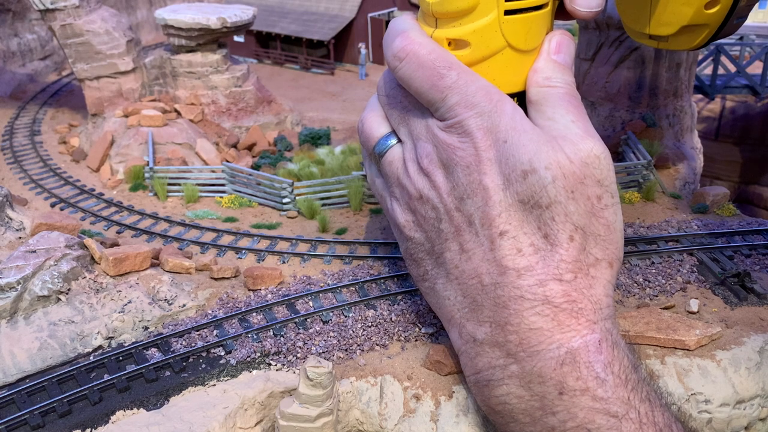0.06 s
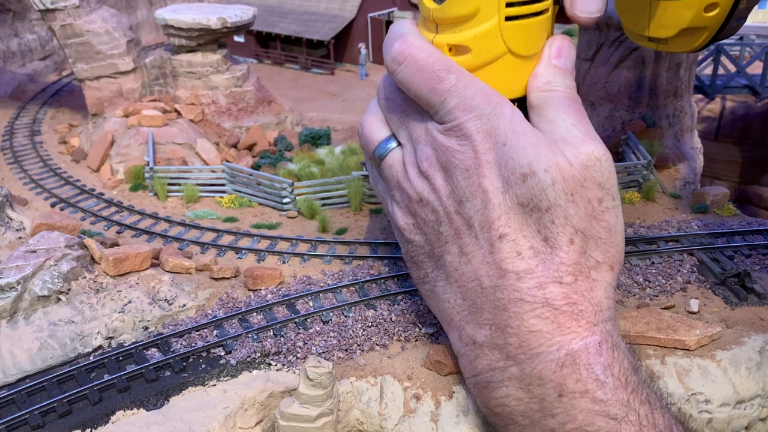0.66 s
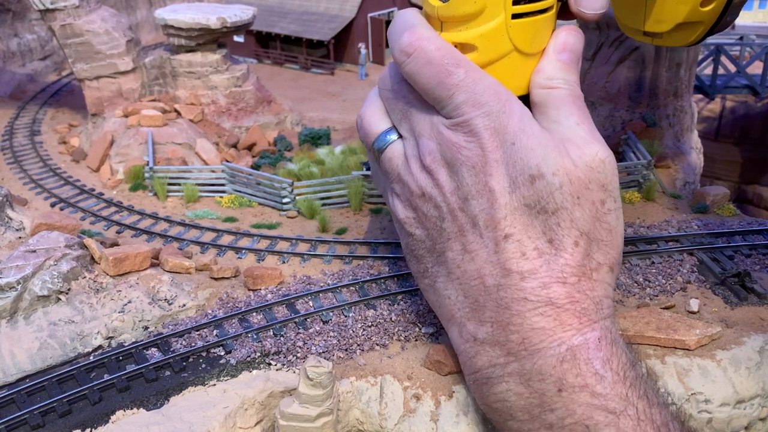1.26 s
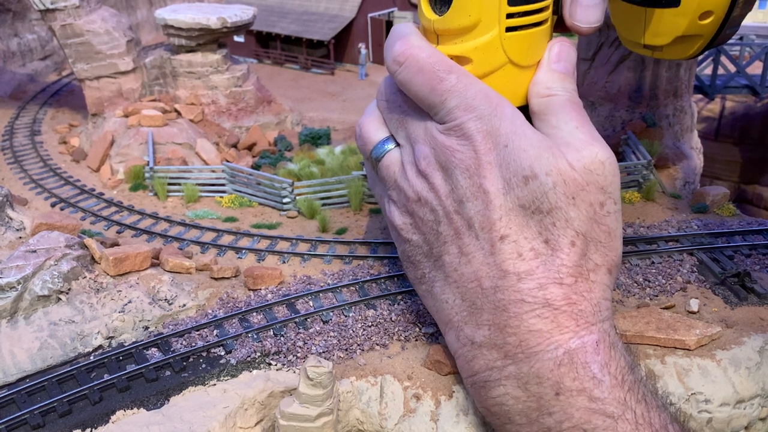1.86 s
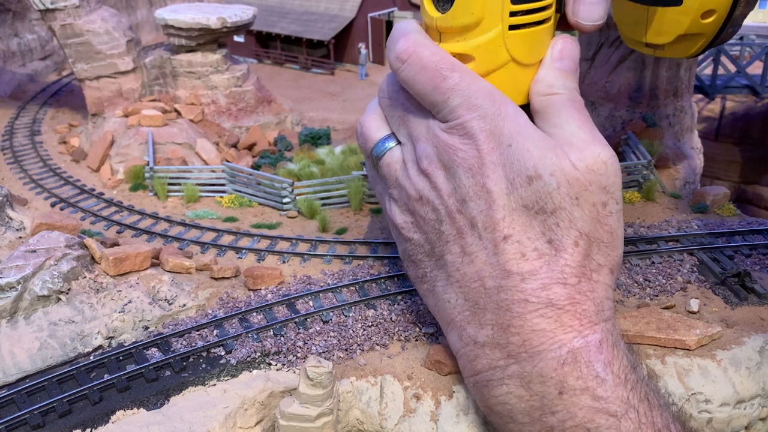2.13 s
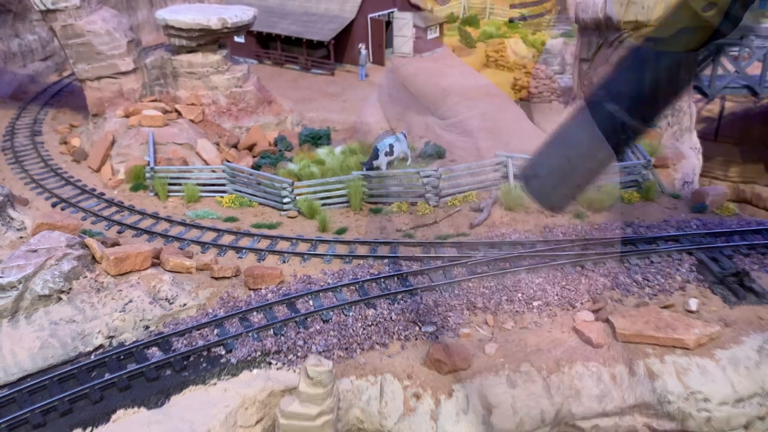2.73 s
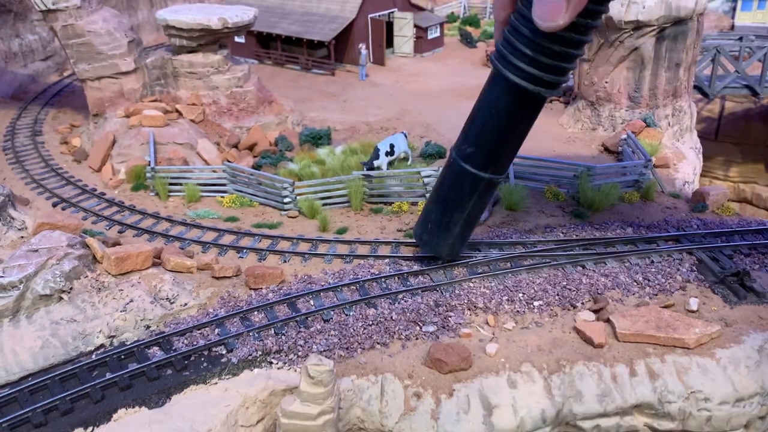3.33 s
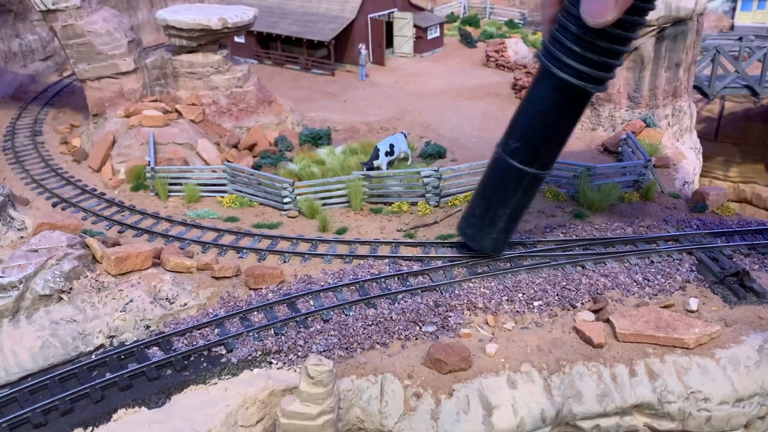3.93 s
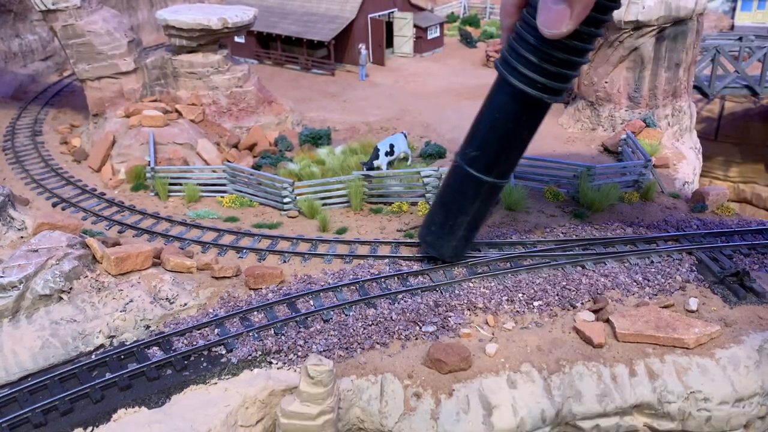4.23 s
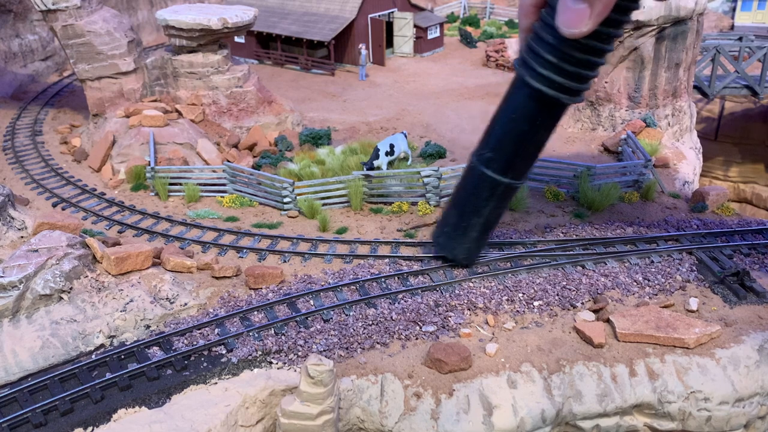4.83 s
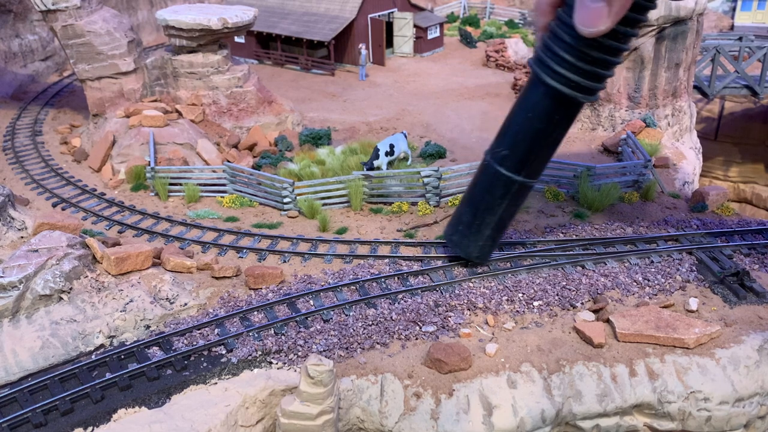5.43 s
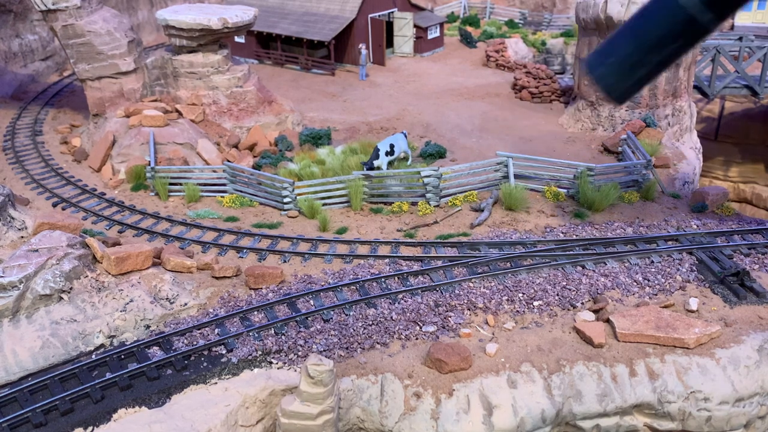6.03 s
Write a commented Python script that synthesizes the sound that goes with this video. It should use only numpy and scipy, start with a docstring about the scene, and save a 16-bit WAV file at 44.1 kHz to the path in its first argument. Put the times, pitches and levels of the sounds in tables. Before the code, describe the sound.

A small electric drill whirs steadily and fades, then a switch clicks and a vacuum cleaner spins up, hisses and starts winding down.

```python
"""A small electric drill whirs through a model railway board, close to the microphone, and fades out. A switch
clicks; a vacuum cleaner spins up, its nozzle hisses over the track, and it winds down. The drill is rotor and
gear lines over a rasp, with the board droning under the bit; the vacuum is fan tones in a roar of air. The
place is a quiet room, heard through a two-port stereo microphone."""
import sys
import numpy as np
from scipy import signal
from scipy.fft import rfft, irfft, next_fast_len
from scipy.io import wavfile
from scipy.ndimage import uniform_filter1d

SR = 44100
rng = np.random.default_rng(int(sys.argv[2]) if len(sys.argv) > 2 else 0)


def wav_out(sig):
    """Save sig, one row per channel (or a flat mono array), as 16-bit PCM at SR to the path in sys.argv[1]."""
    wavfile.write(sys.argv[1], SR, np.round(np.clip(np.atleast_2d(sig).T, -1, 1) * 32767).astype(np.int16))


N = 268083
TIME, BINS = np.arange(N) / SR, np.fft.rfftfreq(N, 1 / SR)
SWITCH_S, OFF_S = 3.312, 5.52  # the vacuum's power comes on, goes off
FAN_HZ = 328.9  # turns a second at top speed
SPIN_UP_S, FLOW_UP_S = 0.3, 0.45  # time constants: the air flow builds more slowly than the fan


def amp(db):
    """Decibels to gain."""
    return 10 ** (np.asarray(db) / 20)


def unit(x):
    """Scales to rms 1."""
    return x / np.sqrt(np.mean(x ** 2) + 1e-20)


def tone(turns):
    """A sine of rms 1."""
    return np.sqrt(2) * np.sin(2 * np.pi * turns)


def follow(rows):
    """Each column of a curve table at every sample."""
    times, *columns = np.transpose(rows)
    return [np.interp(TIME, times, column) for column in columns]


def held(start, end, edge):
    """Rises from 0 to 1 around start, holds, and falls back around end."""
    return np.clip(np.minimum(TIME - start, end - TIME) / edge + .5, 0, 1)


def spectrum(points):
    """A spectrum table at every frequency bin."""
    hz, value = np.transpose(points)
    return np.interp(np.log(BINS + 1), np.log(hz + 1), value)


def resonances(peaks, at=BINS):
    """Peaks and dips as a dB curve over frequency."""
    return sum(db / (1 + (2 * (at - hz) / width) ** 2) for hz, width, db in peaks)


def pan(side_db):
    """Left and right gains of constant total power; positive is left."""
    gains = amp(np.array([side_db, -side_db]) / 2).reshape(2, -1)
    return gains / np.sqrt(np.mean(gains ** 2, 0))


def drift(hz):
    """Random wander of rms 1, up to about the given rate."""
    size = next_fast_len(N, True)
    rolloff = 1 + (np.fft.rfftfreq(size, 1 / SR) / hz) ** 4
    return unit(irfft(rfft(rng.standard_normal(size)) / rolloff, size)[:N])


def breathy(hz, width_hz):
    """A narrow band of turbulence of rms 1 around a steady or gliding pitch."""
    turns = np.cumsum(hz * np.ones(N)) / SR
    return (np.exp(2j * np.pi * turns) * (drift(width_hz) + 1j * drift(width_hz))).real


def puff(peak_s, length_s, hz, width_hz, db):
    """A band of noise that swells and vanishes."""
    return amp(db) * np.exp(-(2 * (TIME - peak_s) / length_s) ** 2) * breathy(hz, width_hz)


def at_ports(pair):
    """Spectra of two unrelated signals, mixed as the microphone's two ports share them."""
    # how alike the ports sound: (frequency [Hz], likeness [0-1])
    likeness = [(60, 1), (300, 0.64), (800, 0.32), (1700, 0.84), (3000, 0.33), (4100, 0.22), (5800, 0.083),
                (7300, 0.64), (8600, 1), (9600, 0.97), (11000, 1), (15500, 0.97)]
    a, b = rfft(pair)
    same = np.clip(spectrum(likeness), 0, 1)
    return np.array([a, same * a + np.sqrt(1 - same ** 2) * b])


def noise():
    """Spectra of white noise at the two ports."""
    return at_ports(rng.standard_normal((2, N)))


def colour(spectra, shape_db, side_db=0.):
    """Shapes two spectra, places them, and returns sound of rms 1."""
    return unit(irfft(spectra * amp(shape_db) * pan(side_db), N))


def walls(x, count=500, t60=.35):
    """The room's sparse reflections, of random sign, dying away."""
    taps = np.zeros((2, SR // 3))
    delays = rng.integers(200, SR // 3, (2, count))
    np.put_along_axis(taps, delays, rng.choice([-1, 1], delays.shape) * amp(-60 * delays / SR / t60), 1)
    return signal.fftconvolve(x, taps / np.linalg.norm(taps[0]), axes=1)[:, :N]


def room_tone(level_db=-60.5):
    """The faint, low background of the room."""
    # background spectrum: (frequency [Hz], relative density [dB])
    floor = [(20, -44), (45, -6.5), (60, 6.5), (90, -1.5), (160, -6), (300, -17), (800, -21), (2000, -46.5),
             (15000, -47.5)]
    return amp(level_db) * colour(noise(), spectrum(floor), side_db=-1.)


def hose_thuds(rise_s=0.049):
    """The hose is shifted and thuds softly."""
    # bumps of the hose: (time [s], level [dB])
    thuds = [(5.63, -46.5), (5.76, -53.5)]
    level = 0
    for peak_s, db in thuds:
        age = np.maximum((TIME - peak_s) / rise_s + 1, 0)
        level = level + amp(db) * age * np.exp(1 - age)
    shape_db = spectrum([(15, -52), (30, -20), (50, 6), (75, -6.0), (130, 0), (400, -43), (2000, -80)])
    return level * colour(noise(), shape_db, side_db=-1.)


def switch(ring_db=-34.5, snap_db=-32.0, room_db=-6.0, rattle_db=-52, rattle_s=3.334):
    """A dry snap that knocks the plastic body, rattles briefly and scatters round the room."""
    # modes of the body: (frequency [Hz], relative level [dB], time to fall 60 dB [s])
    modes = [(1375, 0, 0.05), (2280, -8, 0.025), (2850, -6, 0.025), (3560, -7, 0.02), (4300, -6, 0.014),
             (5200, -9, 0.018), (7900, -5, 0.012)]
    # spectrum of the snap: (frequency [Hz], relative density [dB])
    snap_shape = [(300, 1), (1000, -12), (1400, 4), (2000, -4), (4000, 7.5), (6000, 0), (8200, 0),
                  (10000, -4), (15000, -13)]
    age = np.maximum(TIME - SWITCH_S, 0)
    ring = sum(amp(db - 60 * age / t60) * tone(hz * age) for hz, db, t60 in modes)
    snap = colour(noise(), spectrum(snap_shape)) * np.exp(-age / 0.0031) * np.clip(age / 0.0014, 0, 1)
    clack = amp(ring_db) * ring / abs(ring).max() + amp(snap_db) * snap
    rattle_age = TIME - rattle_s
    rattle = np.exp(-np.maximum(rattle_age, 0) / .014) * np.clip(rattle_age / .012 + 1, 0, 1)
    return clack + amp(room_db) * walls(clack) + amp(rattle_db) * rattle * breathy(3500, 550)


def inrush(hum_hz=120.2, hum_db=-54.5, overtone_db=1.5, rumble_db=-45.5, decay_s=0.84):
    """The starting current makes the vacuum's motor hum at twice the mains rate and jolts its housing."""
    age = np.maximum(TIME - SWITCH_S, 0)
    turns = np.cumsum(hum_hz * (1 + 0.037 * drift(26.0))) / SR
    hum = tone(turns) + amp(overtone_db) * tone(2 * turns) * (1 + .5 * drift(25))
    rumble = colour(noise(), spectrum([(40, -16), (130, 1), (270, 8), (500, 6), (900, 6.5), (2500, -43)]))
    jolt = puff(peak_s=3.521, length_s=.04, hz=290, width_hz=170, db=-46)
    return (amp(hum_db) * hum + amp(rumble_db) * rumble) * np.exp(-age / decay_s) + jolt


def squeak(peak_s=3.406, peak_hz=1070, peak_db=-39.5, glide_hz_per_s=7000):
    """A short rising squeak as the fan gathers speed; it swells and breaks off."""
    rise_db_per_s, fall_db_per_s = 380, 1400
    age = np.clip(TIME - peak_s, -.1, .1)
    hz = (peak_hz + glide_hz_per_s * age) * (1 + .04 * drift(150))
    db = peak_db + np.minimum(rise_db_per_s * age, -fall_db_per_s * age)
    return amp(db) * tone(np.cumsum(hz) / SR)


def rim_whistles():
    """Air whistles breathily over the nozzle's rim where the gap is narrowest."""
    # edge tones: (time [s], length [s], pitch [Hz], width [Hz], level [dB])
    whistles = [(4.693, 0.056, 9100, 900, -33), (4.762, 0.039, 12000, 2000, -24),
                (4.93, 0.044, 10040, 350, -33), (5.12, 0.046, 4700, 70, -35), (5.294, 0.052, 4300, 90, -36),
                (5.618, 0.074, 4520, 50, -34), (5.99, 0.08, 3390, 70, -46)]
    return sum(puff(*whistle) for whistle in whistles)


def hose_note(hz=843.0, width_hz=19.5):
    """The flow blows the hose's main standing wave into a hollow, fluttering note, left of centre."""
    # swell of the note: (time [s], level [dB])
    swell = [(3.35, -70), (3.45, -56), (3.475, -49), (3.51, -54), (3.7, -46), (4.1, -39), (4.9, -36),
             (5.22, -30.5), (5.45, -34.5), (6.08, -43)]
    level = amp(follow(swell)[0]) * (1 + 0.18 * drift(22.0))
    return level * pan(4.5) * breathy(hz, width_hz)


def spin(rise_s, half_speed_s=1.15):
    """Share of full speed: an exponential approach under power, then coasting against air drag."""
    driven = 1 - np.exp(-np.clip(TIME - SWITCH_S, 0, OFF_S - SWITCH_S) / rise_s)
    return driven / (1 + np.maximum(TIME - OFF_S, 0) / half_speed_s)


def power_law(share, full_db, db_per_decade):
    """Level in dB of a sound that grows as a power of speed or flow."""
    return full_db + db_per_decade * np.log10(share + 1e-4)


def blade_wakes():
    """Eddies behind the blades sing breathily, gliding with the fan and fading fast as it slows."""
    # eddy bands: (multiple of fan speed, width [Hz], level at top speed [dB])
    bands = [(12.25, 48, -47.5), (14.4, 114, -43.5)]
    speed = spin(SPIN_UP_S)
    eddies = sum(amp(db) * breathy(order * FAN_HZ * speed, width) for order, width, db in bands)
    return speed ** 3 * spin(FLOW_UP_S) ** 2 * eddies


def fan(blades=6, hum_law=(-34, 11), blade_law=(-39, 38), octave_law=(-50, 42), others_db=-44.5):
    """Unbalance hums once a turn; the blades whistle, and the room smears their glides."""
    # canister response that the tones glide through: (frequency [Hz], width [Hz], gain [dB])
    canister = [(262, 26, 4), (298, 22, 7), (900, 600, -12), (1370, 90, 5), (1570, 130, 5), (1770, 80, 3)]
    # the whistle and its octave swell and sink: (time [s], whistle gain [dB], octave gain [dB])
    swell = [(3.6, -8, 0), (3.78, 1, 0), (4.15, -2, 0), (4.28, 2, 10), (4.52, -4, 10.5), (4.7, 7.5, 3),
             (4.78, 6.5, 1), (4.84, 0, 4), (4.92, 0, 6), (4.97, 6.5, 10), (5.15, 10, 8), (5.38, 6.5, 7.5),
             (5.52, 9.5, 8), (5.6, 2, 3), (5.72, -1, 0)]
    radiates_hz, coast_db, coast_build_s = 198, 3.5, 0.13
    speed = spin(SPIN_UP_S)
    hz = FAN_HZ * speed
    turns = np.cumsum(hz * (1 + 0.00067 * drift(27))) / SR

    def partial(law, order, flutter=0.064):
        """One multiple of the turn, lifted or held back by the canister."""
        db = power_law(speed, *law) + resonances(canister, order * hz)
        return amp(db) * tone(order * turns) * (1 + flutter * drift(39))

    whistle_db, octave_db = follow(swell)
    whistle = partial(blade_law, blades) * amp(whistle_db) * pan(-3.6)
    whistle += partial(octave_law, 2 * blades) * amp(octave_db + 3.5 * drift(7))
    hum = partial(hum_law, 1, flutter=0.072) * pan(-2.3)
    hum *= hz ** 8 / (hz ** 8 + radiates_hz ** 8)  # the canister is too small to radiate a lower hum
    hum *= amp(coast_db * np.clip((TIME - OFF_S) / coast_build_s, 0, 1))  # rings out more while coasting
    # unequal blades leave faint lines on other multiples of the turn
    others = sum(tone(order * turns + rng.random()) * (1 + .5 * drift(15)) for order in (2, 3, 8))
    # while the speed changes, reflections lag in pitch and blur the whistle
    glide_hz_per_s = abs(uniform_filter1d(np.gradient(hz), size=2500)) * SR
    blurred = np.clip(glide_hz_per_s / 300, 0, .55)
    whistle = whistle * np.sqrt(1 - blurred) + walls(whistle * np.sqrt(blurred))
    return hum + whistle + amp(others_db) * speed ** 6 * others


def air(roar_law=(-26, 47.4), rush_law=(-27.5, 49.3), hiss_law=(-35.5, 70), turbulent_flow=0.24):
    """Turbulence grows with the flow and rings canister and hose; the nozzle hisses more near the track."""
    # low roar, mid rush, nozzle hiss and hiss of the gap at the track, each:
    # (frequency [Hz], relative density [dB])
    roar_shape = [(20, -47), (55, -17.5), (85, -15.5), (140, -18), (250, -1.5), (480, -8.5), (800, 0),
                  (1100, -5.5), (1600, -8.5), (3000, -46.5)]
    rush_shape = [(700, -29), (1400, -3), (2000, 3), (2700, -0.5), (3400, -1), (4100, -3), (5300, -5),
                  (7500, -11), (15000, -21)]
    hiss_shape = [(2000, -18), (5000, 1.5), (8000, 9.5), (10000, 7.5), (11800, 2), (13200, 2.5), (15700, 0)]
    gap_shape = [(3000, -9), (6000, 1.5), (8000, 1.5), (9500, 6), (11500, 2.5), (13200, 3), (15700, 1.5)]
    # standing waves of canister and hose: (frequency [Hz], width [Hz], gain [dB])
    standing_waves = [(660, 80, 2), (850, 50, 3), (1000, 70, 3), (1480, 120, 3), (1764, 25, 5),
                      (2220, 130, -3), (2400, 110, 5), (2590, 130, 6.5), (2930, 90, -3), (3060, 60, 4.5),
                      (3380, 60, 4), (3490, 70, -4), (4100, 220, 3)]
    # the vacuum's place at the microphone: (frequency [Hz], left minus right [dB])
    balance = [(100, 2), (350, -9.5), (620, 5.5), (900, 2.5), (1400, 0.5), (3800, -1), (5300, -2),
               (7000, -0.5)]
    # nozzle close to the track: (start [s], end [s], extra hiss at start [dB], at end [dB])
    passes = [(3.542, 3.858, 15.5, 8.5), (4.183, 4.362, 10.5, 9.5), (4.365, 4.558, 8, 7),
              (4.56, 4.67, 8.5, 3), (4.668, 4.785, 10, 7.5), (4.789, 5.013, 9.5, 4), (5.34, 5.567, 9.5, 8)]
    flow = spin(FLOW_UP_S)
    pipe_db, side_db = resonances(standing_waves), spectrum(balance)
    gust_db = drift(19)
    roar = colour(noise(), spectrum(roar_shape) + pipe_db, side_db)
    roar *= amp(power_law(flow, *roar_law) + gust_db)
    rush = colour(noise(), spectrum(rush_shape) + pipe_db, side_db)
    rush *= amp(power_law(flow, *rush_law) + gust_db / 2)
    hiss_db = power_law(flow, *hiss_law) + drift(56) + 1.5 * drift(7.4)
    near_db = sum(np.interp(TIME, [start, end], [first_db, last_db]) * held(start, end, edge=0.04)
                  for start, end, first_db, last_db in passes)
    gap = np.sqrt(np.maximum(amp(2 * near_db) - 1, 0)) * colour(noise(), spectrum(gap_shape), side_db)
    hiss = colour(noise(), spectrum(hiss_shape), side_db)
    turbulent = flow ** 8 / (flow ** 8 + turbulent_flow ** 8)  # no hiss until the flow turns turbulent
    return roar + rush + turbulent * amp(hiss_db) * (hiss + gap)


def drill_fade(start_s=2.145, end_s=3.125):
    """The drill's sound fades out along half a cosine."""
    return .5 + .5 * np.cos(np.pi * np.clip((TIME - start_s) / (end_s - start_s), 0, 1))


def board(hum_hz=96.7, idle_db=-66.5, press_s=0.12):
    """The board drones unsteadily under the bit, louder and with a low grinding while it is pressed."""
    # the bit presses on the board: (start [s], end [s], hum [dB], grinding [dB])
    presses = [(0.196, 1.177, -58.5, -53.5), (1.777, 2.9, -55, -69)]
    # spectrum of the grinding: (frequency [Hz], relative density [dB])
    grind_shape = [(30, -24), (75, 2.5), (130, -8), (190, -6), (270, 1), (370, -4), (480, -5), (700, -5),
                   (1500, -38)]
    turns = np.cumsum(hum_hz * (1 + 0.04 * drift(16.0))) / SR
    hum_level = amp(idle_db) + sum(amp(db) * held(start, end, press_s) for start, end, db, _ in presses)
    grind_level = sum(amp(db) * held(start, end, press_s) for start, end, _, db in presses)
    return drill_fade() * (hum_level * tone(turns) + grind_level * colour(noise(), spectrum(grind_shape)))


def commutator(turns, segments=11, trim_db=-0.7):
    """The commutator whines at one cycle for each passing segment."""
    # swell of the whine: (time [s], relative level [dB])
    swell = [(0.0, -36), (0.2, -34), (0.68, -30.3), (1.33, -35), (1.85, -32), (2.28, -33.7), (2.45, -38.5),
             (2.62, -38.5), (2.85, -48)]
    fade = drill_fade()
    dying = np.minimum(fade / np.interp(swell[-1][0], TIME, fade), 1)  # fades after the last point
    quiver = 1 + .05 * drift(45)
    return amp(follow(swell)[0] + trim_db) * dying * pan(-2.) * tone(segments * turns) * quiver


def gear_teeth(shaft_turns, size=4096, harmonics=205):
    """Uneven teeth: a scrape comes round with each shaft turn and slowly changes, at even strength."""
    place = shaft_turns % 1 * size
    scrapes = irfft(rng.standard_normal((4, harmonics)) + 1j * rng.standard_normal((4, harmonics)), size)
    blend = np.array([drift(2.24) for _ in scrapes])
    blend /= np.linalg.norm(blend, axis=0)
    repeating = [np.interp(place, np.arange(size), scrape) for scrape in scrapes]
    return unit(np.sum(blend * repeating, axis=0))


def gear_rasp(turns, gear_ratio=5, rotor_throb=0.046, shaft_throb=0.02, chatter_db=0.7):
    """The gears rasp through the housing, throbbing with each turn of rotor and geared-down shaft."""
    # spectrum of the rasp: (frequency [Hz], relative density [dB])
    rasp_shape = [(25, -39), (120, -26), (215, -24.5), (310, -12.5), (520, -15.5), (900, -15.5), (1350, -6),
                  (2000, -13), (3400, -11.5), (4150, -2), (4900, -3), (5500, -6), (7200, -2), (9500, 0.5),
                  (15700, -4)]
    # housing resonances: (frequency [Hz], width [Hz], gain [dB])
    housing = [(3650, 380, -6), (5380, 380, -6), (7720, 320, 2), (9350, 500, -3), (10000, 600, 6),
               (12500, 550, 7), (14000, 200, 3), (14750, 800, 3.5)]
    # the rasp's place at the microphone: (frequency [Hz], left minus right [dB])
    balance = [(100, 0), (600, -2), (1100, 3.5), (1700, 0), (3400, -0.5), (4600, -3), (6000, -5), (7500, 0)]
    # power that repeats with the teeth: (frequency [Hz], share [0-1])
    tooth_share = [(300, .04), (1500, .08), (3200, .3), (5500, .3), (8000, .35), (10000, .2), (15000, .15)]
    shaft_turns = turns / gear_ratio
    throb = 1 + rotor_throb * tone(turns) + shaft_throb * tone(shaft_turns)
    teeth = at_ports([gear_teeth(shaft_turns), gear_teeth(shaft_turns)])
    share = spectrum(tooth_share)
    scrape = irfft(np.sqrt(1 - share) * noise() + np.sqrt(share) * teeth, N)
    scrape *= throb * amp(chatter_db * drift(28))
    return colour(rfft(scrape), spectrum(rasp_shape) + resonances(housing), spectrum(balance))


def rotor_lines(turns, play_turns=.0025):
    """Rotor, bearings and gears sing at set multiples of the rotor's speed."""
    # lines: (multiple of rotor speed, level against the drill's [dB], left minus right [dB])
    lines = [(.6, -36, 0), (.875, -24.5, 1), (1.75, -30.5, 8), (2, -36, 0), (2.625, -25, 8),
             (3.5, -31.5, 0), (3.8, -29, 0), (4, -31, 6), (4.375, -30, 2), (5.4, -36, 0), (5.7, -34, 0),
             (7, -28.5, -2), (8, -27.5, -2), (8.58, -32, 0), (8.8, -34, 0), (9.4, -32, -3),
             (9.8, -26.5, -4), (10, -15, -4), (10.2, -22.5, -7), (10.4, -27, -6), (10.5, -13.5, -6),
             (10.6, -23, -6), (11.6, -16.5, -10), (12, -21.5, -6), (12.8, -27, -10), (13, -19, -6),
             (13.8, -30, -4), (14, -23, -4), (14.4, -29, -4), (15, -27, -8), (16, -23.5, -9), (17, -23, -1),
             (17.5, -24, -1), (18, -22, 0), (19, -24, 0), (20, -13.5, 1), (20.2, -22, 0), (21, -11.5, -1),
             (21.2, -19, 0), (21.4, -18.5, 0), (21.6, -21, 0), (22, -8.5, 0), (25.2, -20, -1),
             (32, -15.5, 0), (32.6, -22, 0), (36, -18, 0)]
    whir = 0
    for multiple, db, side_db in lines:
        loose_turns = turns + play_turns * drift(60)  # play in the gears blurs the high lines most
        flutter = 1 + .15 * drift(18)
        whir = whir + amp(db) * pan(side_db) * tone(multiple * loose_turns + rng.random()) * flutter
    return whir


def drill(level_db=-28, bite_db=-4.0, bite_s=0.56, rasp_db=5.0, jitter=0.00077):
    """The drill, close up: one rotor drives lines, whine and rasp; it builds as the bit bites, then fades."""
    # the rotor sags and recovers with the load: (time [s], speed [turns/s])
    rotor_speed = [(0.0, 389.2), (0.4, 389.4), (0.53, 388.5), (0.68, 389.2), (0.83, 388.0), (0.95, 388.7),
                   (1.13, 388.4), (1.28, 389.8), (1.6, 389.6), (1.85, 389.1), (2.13, 388.1), (2.38, 389.4),
                   (2.6, 390.1), (2.73, 388.3), (2.88, 387.9)]
    turns = np.cumsum(follow(rotor_speed)[0] * (1 + jitter * drift(24.7))) / SR
    lines = rotor_lines(turns)
    level = amp(level_db + bite_db * np.maximum(1 - TIME / bite_s, 0)) * drill_fade()
    return commutator(turns) + level * (lines + amp(rasp_db) * gear_rasp(turns))


def scene():
    """The drill, then the vacuum cleaner from the moment it is switched on, over a quiet room."""
    drilling = drill() + board()
    click = switch()
    started = np.clip((TIME - SWITCH_S) / 0.055, 0, 1)
    vacuum = inrush() + fan() + blade_wakes() + air() + hose_note()
    vacuum += squeak() + rim_whistles() + hose_thuds()
    return drilling + click + started * vacuum + room_tone()


def record(dry, top_hz=15800):
    """The microphone's two ports hear each frequency at a different phase; the top treble is cut off."""
    # phase between the ports: (frequency [Hz], left leads by [rad])
    phase_lead = [(80, 0), (400, .6), (1200, .4), (3000, 1), (4200, 2), (5200, 2.1), (6400, 0),
                  (7800, -2.4), (8200, -2.95), (8600, -3.14), (8900, -3.3), (10900, -6.28), (11500, -6.4),
                  (13000, -9.2), (13900, -9.6), (15300, -12.57)]
    half_lead = np.exp(.5j * spectrum(phase_lead))
    ported = irfft(rfft(dry) * np.array([half_lead, half_lead.conj()]), N)
    lowpass = signal.firwin(511, top_hz, window=("kaiser", 9), fs=SR)
    return signal.oaconvolve(ported, lowpass[None], "same")


dry = scene()
out = record(dry)
wav_out(out)
```